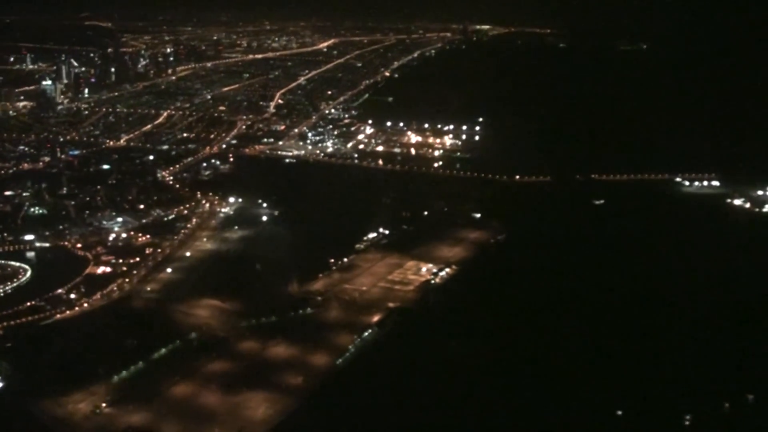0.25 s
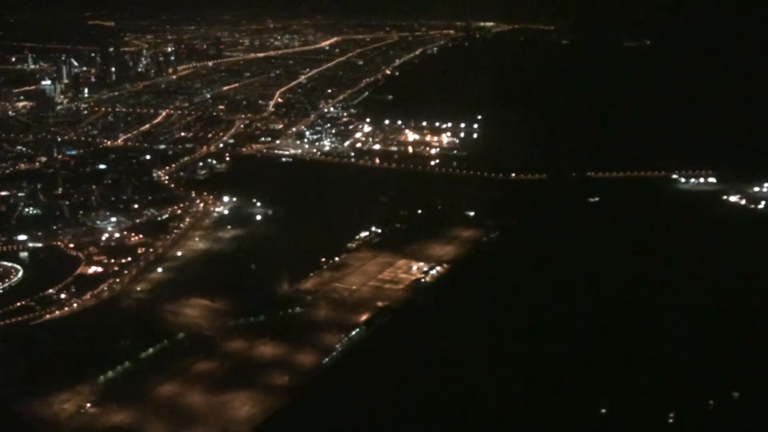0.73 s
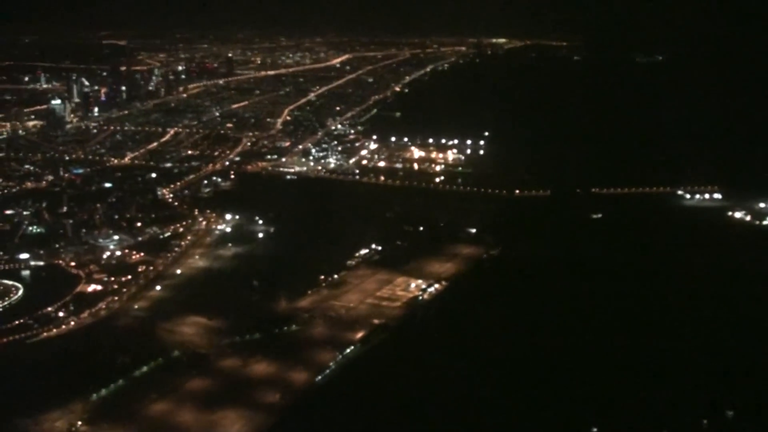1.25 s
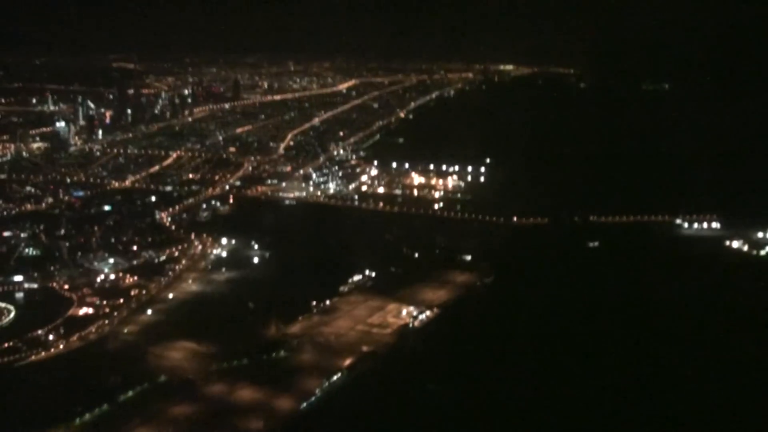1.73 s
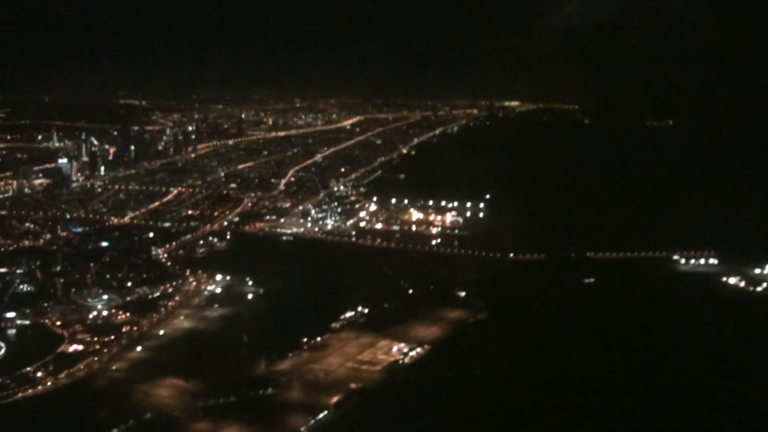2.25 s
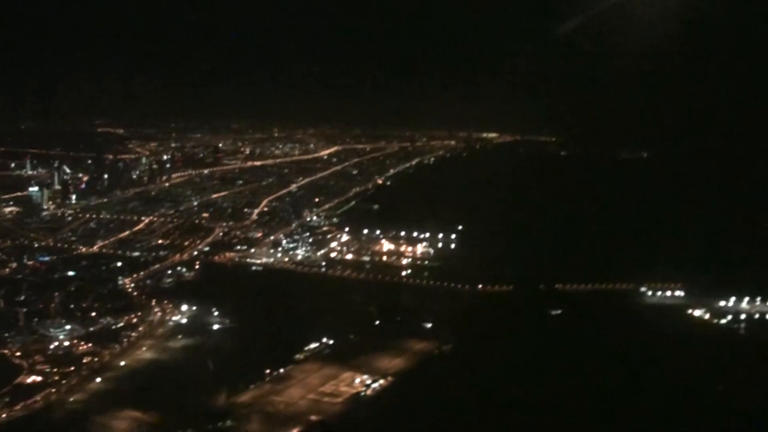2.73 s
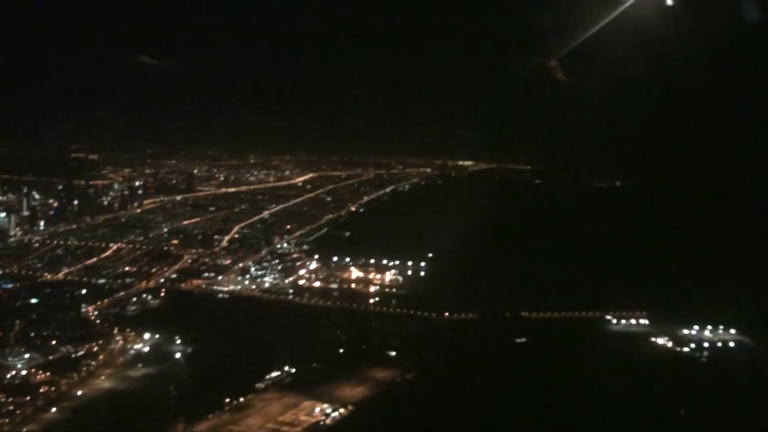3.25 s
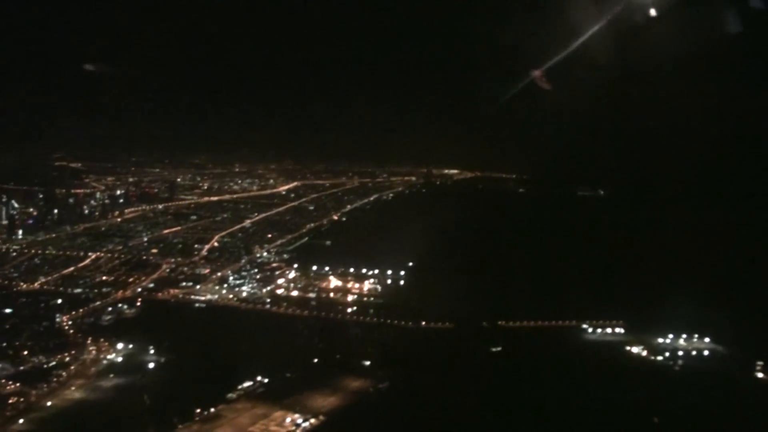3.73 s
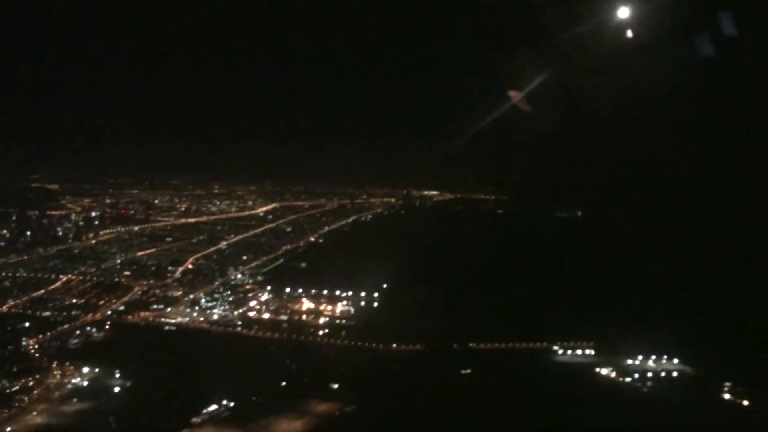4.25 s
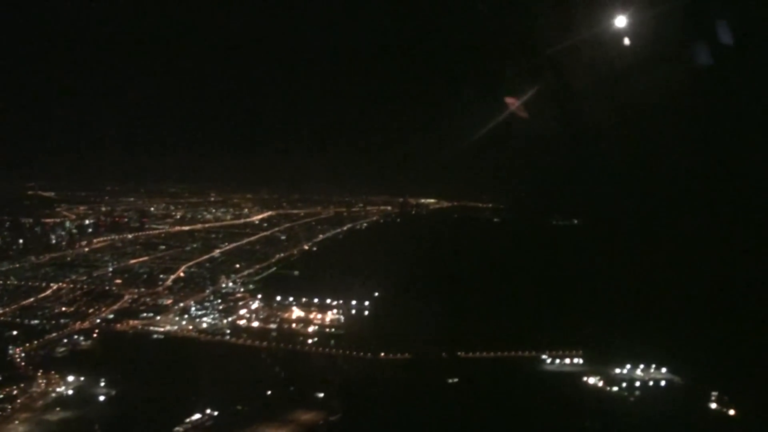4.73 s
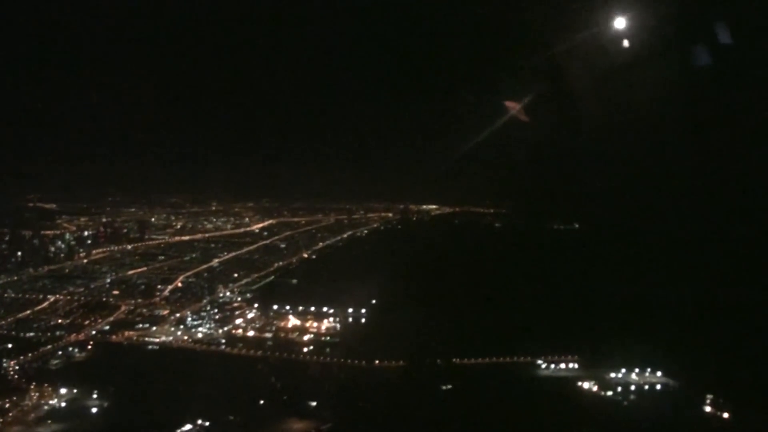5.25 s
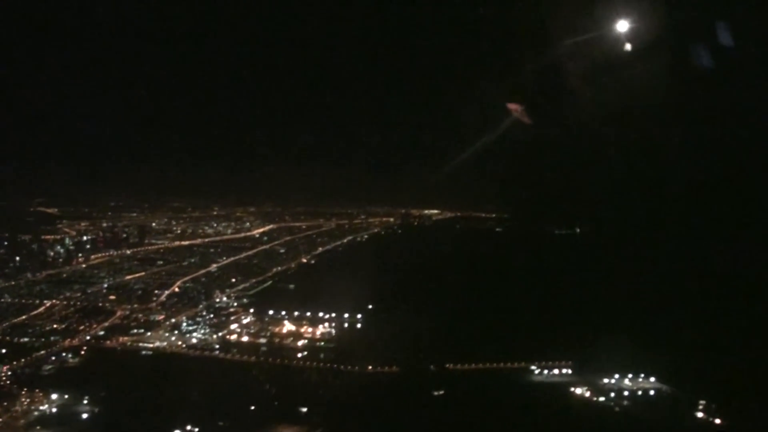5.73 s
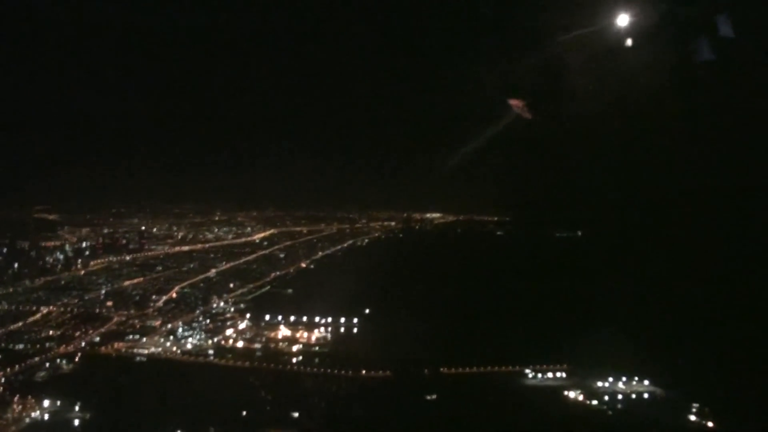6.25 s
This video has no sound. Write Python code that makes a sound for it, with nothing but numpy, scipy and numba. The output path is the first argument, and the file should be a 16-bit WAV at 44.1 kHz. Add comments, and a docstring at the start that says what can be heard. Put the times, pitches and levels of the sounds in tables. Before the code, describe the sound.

Continuous jet cabin noise at night, close and enclosed: dominant bassy roar, quieter rushing air, and very faint high whines from fans and machinery. Tiny dry ticks and buzzing of loose panel trim ride on the rumble, with one small cloth-like rustle near the start. Around two to three seconds the tone colour shifts subtly as the phone moves; ticks become sparse, and the drone runs on unbroken to the end.

```python
"""A window seat in a climbing airliner, heard through a phone: filtered noise roars, hisses and whines.
From the start the jet rumble drones, air hisses, thin tones whine and loose trim chatters.
Just before 1 s something rustles once, in short bursts of noise; trim ticks are most frequent up to 3 s.
From 2.2 to 3.3 s the phone moves: the resonances change weight and the chatter grows fainter.
To the end narrow bands swell briefly within the steady rumble, and a fast limiter makes the hiss flutter."""
import sys
import numpy as np
from scipy import signal
from scipy.fft import rfft, irfft
from scipy.io import wavfile
from scipy.ndimage import uniform_filter1d, map_coordinates
from numba import njit

SR = 44100
rng = np.random.default_rng(int(sys.argv[2]) if len(sys.argv) > 2 else 0)


def bounce(signal):
    """Save signal as a 16-bit WAV file at the path given by the first command-line argument."""
    frames = np.transpose(np.atleast_2d(signal))
    limited = np.clip(frames, -1, 1)
    pcm = np.round(limited * 32767).astype(np.int16)
    wavfile.write(sys.argv[1], SR, pcm)


N = 286209

# colour of the jet noise coming through the fuselage: f/Hz, relative level per Hz/dB
JET_COLOUR = [(10, -23), (28, -18.5), (42, -18), (62, -1.5), (90, -0.07), (135, -3), (190, -6),
              (228, -12.5), (335, -11), (364, -23), (440, -27), (495, -31), (590, -33), (690, -41),
              (1200, -51.5), (16000, -125)]
# cabin and wall panel resonances: f/Hz, width/Hz, lift before the move/dB, lift after it/dB
CABIN_RESONANCES = [(74.7, 12, -1, 0), (101.5, 14, 0.1, -1.5), (160.9, 17, 6, 3), (204, 11, 4, 3.5),
                    (257.3, 18, 7, 3.5), (301.3, 34, 4, 3.5), (337, 18, 4.8, 3.5), (387.7, 24, 6, 5),
                    (447, 26, 8.5, 7), (546.4, 47, 5, 4), (620.6, 62, 5.5, 3), (797, 48, 7, 9.5),
                    (887, 97, 6.5, 6)]
# resonances that drone on unbroken: f/Hz, pitch waver/Hz, level against the roar/dB, change over the move/dB
DRONE_TONES = [(101, 5, -11, -3), (160.6, 4, -14, -3), (335.6, 7, -26, 1)]
# brief random swells of narrow bands within the steady rumble: t/s, f/Hz, level against the roar/dB
BAND_SWELLS = [(.26, 97.8, -5), (.83, 104.1, -6), (1.21, 257, -12), (1.51, 93.7, -5), (1.52, 160.9, -6.5),
               (2.11, 97.9, -5), (2.92, 157.2, -4), (3.41, 329.2, -12.5), (4.22, 104, -5), (4.33, 83.1, -7),
               (4.51, 84.2, -3.5), (4.7, 74.04, -5), (4.7, 259, -10.5), (4.85, 142, -6.5), (5.15, 74, -4),
               (5.31, 332.6, -12), (5.95, 161, -6), (6.14, 74, -1.5)]
# colour of the slipstream on the skin and air from the vents: f/Hz, relative level per Hz/dB
AIR_COLOUR = [(300, 12), (900, 4), (1250, 0), (2330, -4.5), (2660, -3.5), (2860, -5), (4200, -8),
              (5500, -5), (6500, -1.1), (7200, -2), (8000, -6.5), (9000, -13.5), (10600, -18),
              (12200, -13.5), (16000, -36)]
# peaks and hollows of the hiss in the window recess: f/Hz, width/Hz, lift before the move/dB, after it/dB
RECESS_RESONANCES = [(1290, 130, 3, -4.5), (1670, 120, 3.5, 1), (1840, 200, 0, -1.5), (2270, 150, -3, 0.5),
                     (2400, 130, 3, 2), (2820, 90, -3, -3), (3100, 300, 3.5, -1.5), (4020, 260, 4, -1.5),
                     (4720, 210, 1, 4.5), (5020, 180, 0, -6), (5300, 250, 1.5, 1.5), (5770, 200, -1, -1.5)]
# drifting resonance at the top of the hiss: t/s, f/Hz, level before brief swells/dB
HISS_PEAK_PATH = [(0, 6400, -64), (1.05, 6550, -61), (1.4, 6650, -68.5), (1.95, 6874, -65),
                  (3.0, 6910, -60.5), (3.5, 6764, -64), (4.0, 6930, -63.5), (4.5, 6836, -68),
                  (5.2, 6810, -61.5), (6.0, 6905, -64)]
# the phone moving through the standing waves: t/s, share of the move/0-1
PHONE_MOVE = [(2.2, 0.01), (3.3, 0.88)]
# breathy fan and duct whines: f/Hz, width/Hz, level before a shared boost/dB, change over the move/dB
WHINE_BANDS = [(807.5, 18, -65, 4), (1421, 30, -68, -6.5), (2105, 70, -75, 9)]
# clean tones of shafts and pumps: f/Hz, pitch waver/Hz, middle level/dB, change over the move/dB
SHAFT_TONES = [(807.5, 3, -66, 3), (1424, 4, -70, -3), (2127, 4, -72, 0), (2590, 8, -77, 1),
               (3472.5, 1.5, -76, 2.5), (4254, 3, -78, 7), (6072, 8, -82, 5), (6572, 8, -77, 2),
               (6923, 8, -80, 6)]
# colour of a touch of the loose trim: f/Hz, relative level per Hz/dB
TRIM_COLOUR = [(400, 8.5), (1000, 5.5), (1900, -0.5), (2350, -1.5), (3200, -6.5), (4000, -5.5),
               (5000, -2.5), (7000, -3.5), (9000, -12), (13000, -29), (16000, -44)]
# resonances the trim rings with: f/Hz, width/Hz, lift/dB
TRIM_RESONANCES = [(1450, 320, 2.5), (2086, 60, 8.5), (2590, 180, 9), (2754, 90, 6)]
# the trim's harder ticks: t/s, peak of the noise envelope/dB
TICK_TIMES = [(.112, -38), (.179, -36.5), (.187, -38), (.236, -39), (.286, -40), (.357, -40.5), (.437, -40),
              (.527, -39), (.674, -38), (.692, -37.5), (.861, -38.5), (1.013, -37.5), (1.035, -39.5),
              (1.044, -40), (1.266, -39), (1.508, -37), (1.516, -38.5), (1.525, -37.5), (1.647, -37),
              (1.687, -37.5), (1.908, -37.5), (2.042, -36), (2.331, -37), (2.434, -38.5), (2.455, -39),
              (2.691, -38), (2.709, -38.5), (2.861, -38), (3.622, -39), (3.909, -38.5), (4.951, -40),
              (5.273, -39.5), (5.696, -38.5), (5.812, -39), (5.993, -37.5), (6.286, -36)]
# the rustle's brush and its brighter tail: t/s, half-length/s, f/Hz, width/Hz, level at the top/dB
RUSTLE_STROKES = [(.955, .0055, 3550, 1700, -47), (.958, .007, 6000, 2400, -50.5),
                  (.972, .012, 4200, 4600, -53)]
# lag between the two microphone ports: f/Hz, lead of the left/rad
PORT_LAG = [(40, 0.4), (90, -.28), (190, -0.68), (390, -0.9), (450, -.45), (700, -0.17), (800, 0.42),
            (900, -0.59), (1300, 0.88), (1500, -0.93), (2000, 0.069), (8000, -0.098)]
# sound the ports do not share: f/Hz, level against the shared sound/dB
UNSHARED = [(50, -24), (120, -20), (330, -19.5), (500, -13), (720, -6.5), (1200, -13.5), (2600, -13.5),
            (7200, -17), (10500, -4.5), (12500, -21)]
# slow changes of the air hiss: t/s, level about its usual strength/dB
AIR_LEVEL = [(0.9, 1), (1.3, 1.5), (2.4, 1.5), (4.0, 2.5), (4.6, 1.2), (5.15, 3.5)]
# brief swells of the hiss and chatter, as when the limiter lets go:
# t/s, rise before each layer takes its own share/dB
HISS_SWELLS = [(.125, 2.3), (.185, 3), (.24, 1.5), (.355, 1), (.54, 2.3), (.6, 1.5), (.69, 3.5), (.75, 1),
               (.99, 1), (1.28, 2.8), (1.42, 0), (1.525, 3), (1.69, 3.5), (1.9, 4), (2.01, 2), (2.32, 3.5),
               (2.38, 1.5), (2.45, 2.3), (2.63, 1.5), (2.71, 3.5), (2.8, 2.5), (2.87, 1), (3.62, 1),
               (3.92, 2.3), (4.55, 3.5), (5.2, 1), (5.28, 1), (5.41, 0.8), (5.81, 1.5), (5.995, 2.5),
               (6.29, 2)]
# surges (and one dip) of the rumble ahead of the limiter: t/s, rise/dB
RUMBLE_SURGES = [(1.2, 2.5), (1.335, 2), (1.61, 1.5), (1.8, 1), (2.08, 1), (2.2, 2.5), (3.52, 1.8),
                 (4.33, -1.8), (4.63, 1.5), (5.08, 3), (6.21, 3)]

LEFT_DB = .75  # left above right
TOP_HZ = 16000  # nearly nothing passes above this
SWELL_S = 0.02  # half-length of every hiss swell and rumble surge
T = np.arange(N) / SR  # time of each sample in s
HZ = np.maximum(np.arange(N // 2 + 1) * SR / N, 1)  # frequency of each spectrum bin


def undb(db):
    """Turn decibels into a gain."""
    return 10 ** (np.asarray(db) / 20)


def unit(x):
    """Scale to an average (rms) strength of 1."""
    return x / np.sqrt(np.mean(x ** 2))


def contour(points):
    """Join (f, value) points by lines on a log-frequency axis."""
    hz, value = np.transpose(points)
    return np.interp(np.log(HZ), np.log(hz), value)


def curve(points):
    """Join (t, value) points by lines in time."""
    return np.interp(T, *np.transpose(points))


def bell(hz, width):
    """Shape of one resonance over frequency, 1 at its centre."""
    return 1 / (1 + (2 * (HZ - hz) / width) ** 2)


def lifts(table):
    """Add up the dB lifts of a table of resonances, before and after the move."""
    return sum(np.outer([before_db, after_db], bell(hz, width))
               for hz, width, before_db, after_db in table)


def across_move(before, after):
    """Blend the sound at the phone's first position into the sound at its second."""
    moved = np.clip(curve(PHONE_MOVE), 0, 1)
    return np.sqrt(1 - moved) * before + np.sqrt(moved) * after


def swell(at_s, length_s):
    """A smooth rise and fall, 1 at its top."""
    return np.exp(-.5 * ((T - at_s) / length_s) ** 2)


def fade(hits, decay_s):
    """Give each hit an instant rise and an exponential decay."""
    return signal.lfilter([1], [1, -np.exp(-1 / (decay_s * SR))], hits)


def walk(rate):
    """Smooth random wandering, about rate new values a second, spread 1."""
    smoothing = 1 + (2 * HZ / rate) ** 4
    return unit(irfft(rfft(rng.standard_normal(N)) / smoothing, N))


def ringing(gain):
    """Make a spectral shape causal, so that it rings only after each touch."""
    cepstrum = irfft(np.log(gain), N)
    cepstrum[1:] *= 2 * (np.arange(1, N) < N / 2)
    return np.exp(rfft(cepstrum))


def glide(ports, speed):
    """Bend the pitch of a noise by reading it at a changing speed."""
    place = np.cumsum(speed)
    return np.array([map_coordinates(port, [place], mode="mirror") for port in ports])


def field(gain, envelope=1):
    """Noise at the two ports, shaped in time then frequency: a shared wave with a lag, plus unshared sound."""
    shared, diffuse = rfft(envelope * rng.standard_normal((2, N)))
    sides = np.array([[1], [-1]])
    mixed = shared + sides * diffuse * undb(contour(UNSHARED))
    ports = mixed * np.exp(.5j * sides * contour(PORT_LAG))
    return unit(irfft(ports * gain, N)) * np.sqrt(np.mean(np.square(envelope)))


def tone(hz, waver_hz, waver_per_s):
    """One unbroken sine at the two ports, its pitch wandering."""
    phase = 2 * np.pi * np.cumsum(hz + waver_hz * walk(waver_per_s)) / SR
    lead = np.interp(hz, *np.transpose(PORT_LAG))
    return unit(np.sin(phase + np.array([[lead], [-lead]]) / 2))


def patchy_gain(db, change_db, patchy_db, patchy_per_s):
    """A gain that changes with the phone's move and wanders by chance."""
    return undb(db + change_db * curve(PHONE_MOVE) + patchy_db * walk(patchy_per_s))


def hiss_swells():
    """Brief swells, in dB, that the hiss and chatter share, as when the limiter lets go."""
    return sum(rise_db * swell(s, SWELL_S) for s, rise_db in HISS_SWELLS)


def rustle():
    """A soft brush, as of cloth: short bands of noise that trail off into the hiss."""
    return sum(field(bell(hz, width)) * undb(db) * swell(s, length_s)
               for s, length_s, hz, width, db in RUSTLE_STROKES)


def spin_tones(waver_per_s=9, patchy_db=2.5, patchy_per_s=6):
    """Shafts and pumps turn almost evenly, giving thin clean tones that waver slightly."""
    return sum(patchy_gain(db, change_db, patchy_db, patchy_per_s) * tone(hz, waver_hz, waver_per_s)
               for hz, waver_hz, db, change_db in SHAFT_TONES)


def whines(boost_db=4.5, patchy_db=2.5, patchy_per_s=8):
    """Fans and ducts whine breathily: narrow bands of noise that come and go in patches."""
    return sum(patchy_gain(boost_db + db, change_db, patchy_db, patchy_per_s) * field(bell(hz, width))
               for hz, width, db, change_db in WHINE_BANDS)


def chatter(shake, swell_db, db=-52.0, scatter_db=2.5, touch_s=0.0023, swell_share=1.84, move_db=-3.0):
    """Loose trim touches on crests of the rumble and sometimes ticks harder; each scratch rings its modes."""
    # crests are kept apart, at most 200 a second
    crests = signal.find_peaks(shake, height=0, distance=SR // 200)[0]
    touches, ticks = np.zeros(N), np.zeros(N)
    chance = np.clip(rng.standard_normal(N), -2, 2)
    touches[crests] = undb(scatter_db * chance)[crests]
    for s, peak_db in TICK_TIMES:
        ticks[int(s * SR)] = undb(peak_db)
    buzz_db = db + swell_share * swell_db + move_db * curve(PHONE_MOVE)
    buzz = unit(fade(touches, touch_s)) * undb(buzz_db)
    modes_db = sum(lift_db * bell(hz, width) for hz, width, lift_db in TRIM_RESONANCES)
    colour_db = contour(TRIM_COLOUR) + modes_db
    return field(ringing(undb(colour_db)), np.hypot(buzz, fade(ticks, touch_s)))


def sibilance(swell_db, width_hz=520, swell_share=.2):
    """A broad resonance of the hiss: one band of noise that drifts in pitch and strength."""
    s, hz, db = np.transpose(HISS_PEAK_PATH)
    middle_hz = hz.mean()
    band = glide(field(bell(middle_hz, width_hz)), np.interp(T, s, hz) / middle_hz)
    return band * undb(np.interp(T, s, db) + swell_share * swell_db)


def air(swell_db, db=-47.0, ripple_db=1.7, comb_from_hz=2500, swell_share=0.3):
    """Air hisses, finely combed by reflections off window and wall, which change as the phone moves."""
    knots_hz = np.arange(0, SR / 2, 70)
    depth_db = ripple_db * np.minimum(1, HZ / comb_from_hz)  # full depth from comb_from_hz up

    def place(lift_db):
        """The hiss at one position, with its own random comb of reflections."""
        comb = np.interp(HZ, knots_hz, rng.standard_normal(len(knots_hz)))
        return field(undb(contour(AIR_COLOUR) + lift_db + depth_db * comb))

    before, after = (place(lift_db) for lift_db in lifts(RECESS_RESONANCES))
    return across_move(before, after) * undb(db + curve(AIR_LEVEL) + swell_share * swell_db)


def band_swells(length_s=.075, waver_hz=3.0, waver_per_s=12):
    """Brief random swells of narrow bands within the steady rumble, each made by a wavering tone."""
    return sum(undb(db) * swell(s, length_s) * tone(hz, waver_hz, waver_per_s)
               for s, hz, db in BAND_SWELLS)


def drones(waver_per_s=14, patchy_db=2.0, patchy_per_s=8):
    """The strongest cabin resonances sing on as wavering tones."""
    return sum(patchy_gain(db, change_db, patchy_db, patchy_per_s) * tone(hz, waver_hz, waver_per_s)
               for hz, waver_hz, db, change_db in DRONE_TONES)


def rumble(db=-15.5, waver=.004, waver_per_s=5, steadiness=0.52):
    """Exhaust turbulence rings the cabin's wavering resonances, fairly evenly but for a few surges."""
    before, after = (field(undb(contour(JET_COLOUR) + lift_db)) for lift_db in lifts(CABIN_RESONANCES))
    roar = glide(across_move(before, after), 1 + waver * walk(waver_per_s))
    jet = roar + drones() + band_swells()
    # dividing by part of its own short-term strength evens out the rumble
    power = uniform_filter1d(uniform_filter1d(jet[0] ** 2, size=2200), size=1100)
    even = unit(jet / np.sqrt(power) ** steadiness)
    surge_db = sum(rise_db * swell(s, SWELL_S) for s, rise_db in RUMBLE_SURGES)
    return even * undb(db + surge_db)


def scene():
    """Add up all the cabin's sounds, a little stronger on the left."""
    jet = rumble()
    swell_db = hiss_swells()
    machinery = whines() + spin_tones()
    hiss = air(swell_db) + sibilance(swell_db)
    cabin = jet + hiss + chatter(jet[0], swell_db) + machinery + rustle()
    return cabin * undb(np.array([[LEFT_DB], [-LEFT_DB]]) / 2)


@njit
def follow(size, attack, release):
    """Follow the peaks of a sound: quick to rise, slower to fall."""
    out, e = np.empty(len(size)), size[:400].max()
    for i in range(len(size)):
        e += (size[i] - e) * (attack if size[i] > e else release)
        out[i] = e
    return out


def record(dry, ceiling_db=-11.5, attack_s=0.00079, release_s=0.023):
    """The phone's fast limiter looks slightly ahead and holds down the rumble's peaks; then the top is cut."""
    peak = follow(np.abs(dry).max(axis=0), 1 / (attack_s * SR), 1 / (release_s * SR))
    gain = np.minimum(1, undb(ceiling_db) / peak)
    gain = uniform_filter1d(gain, size=132, origin=-44)  # 3 ms average, shifted 1 ms ahead
    low_pass = signal.ellip(8, .2, 70, TOP_HZ, fs=SR, output="sos")
    return signal.sosfilt(low_pass, dry * gain)


dry = scene()
out = record(dry)
bounce(out)
```